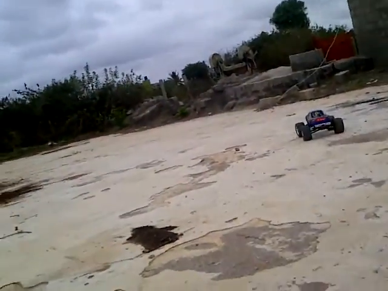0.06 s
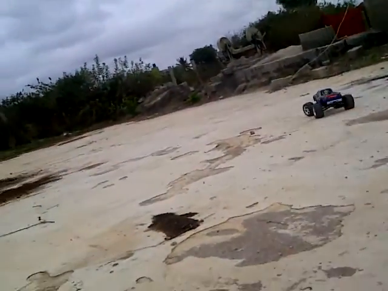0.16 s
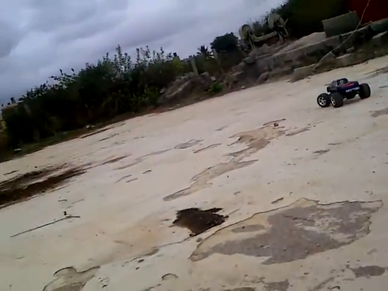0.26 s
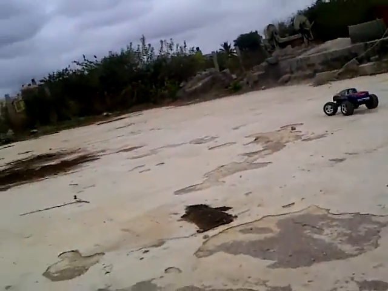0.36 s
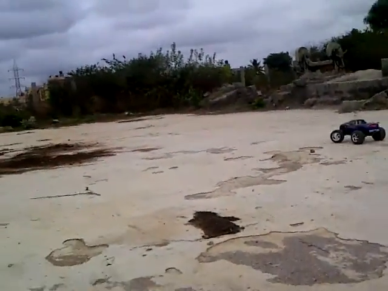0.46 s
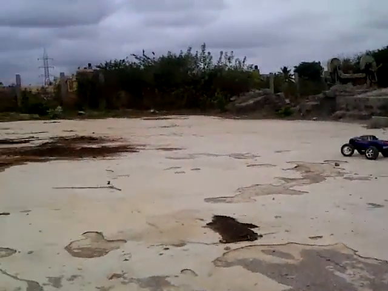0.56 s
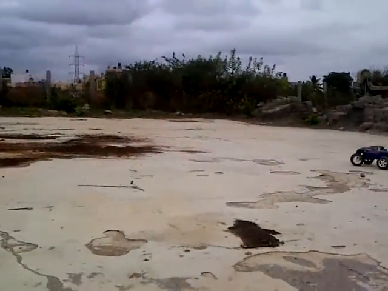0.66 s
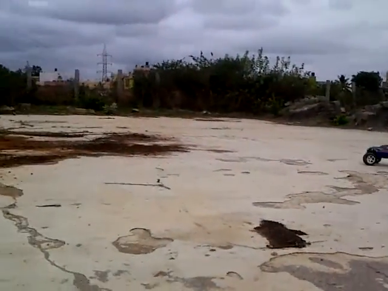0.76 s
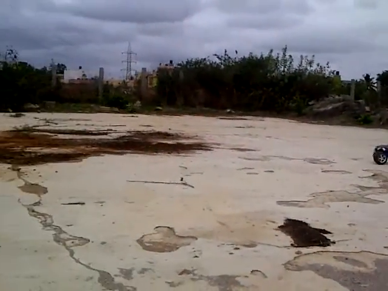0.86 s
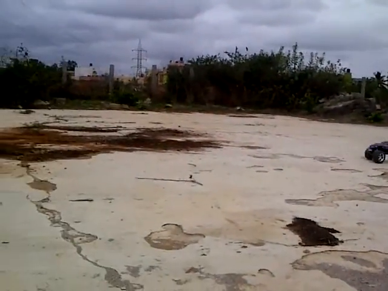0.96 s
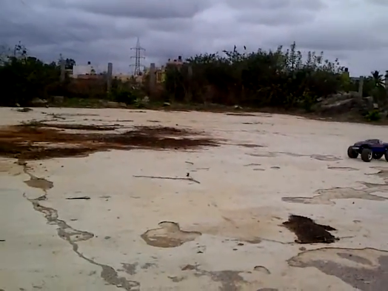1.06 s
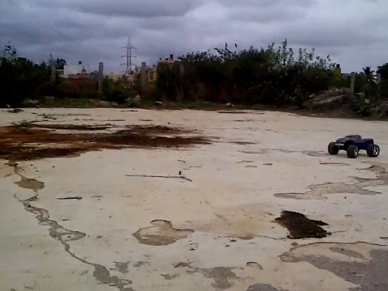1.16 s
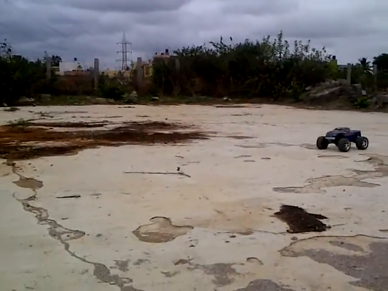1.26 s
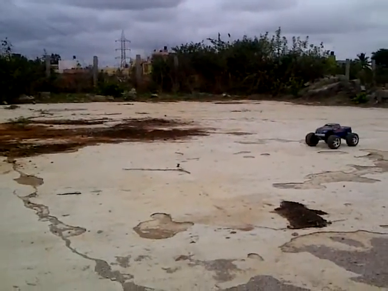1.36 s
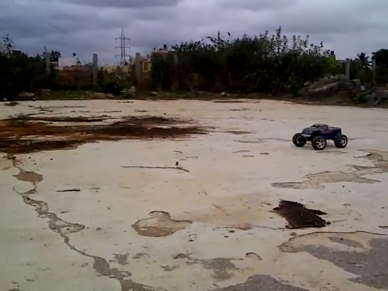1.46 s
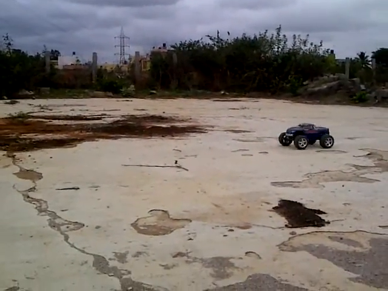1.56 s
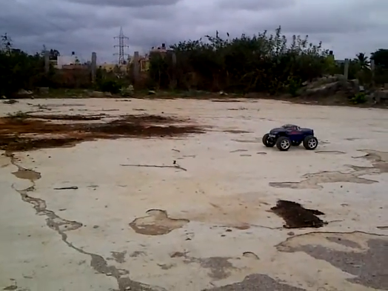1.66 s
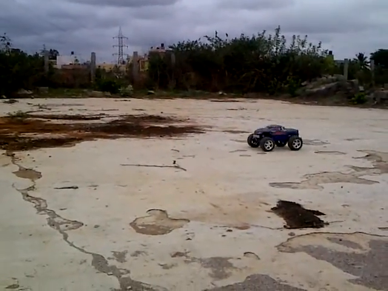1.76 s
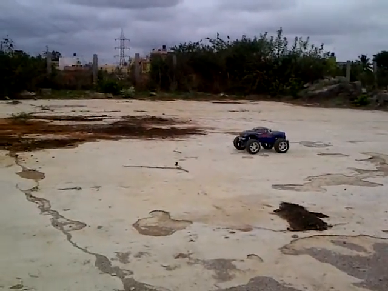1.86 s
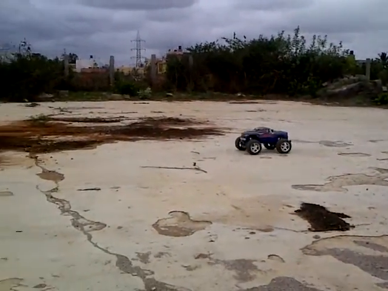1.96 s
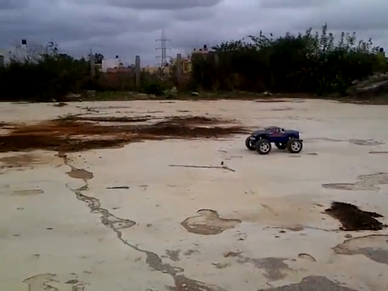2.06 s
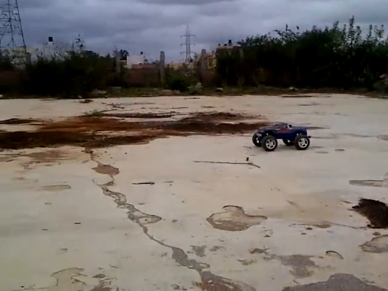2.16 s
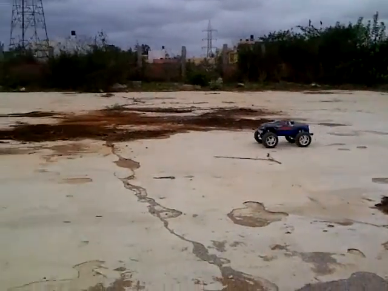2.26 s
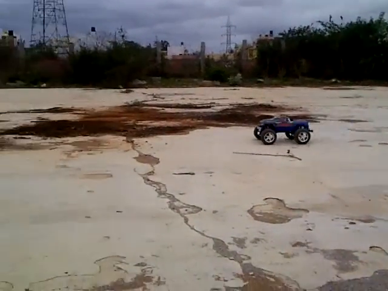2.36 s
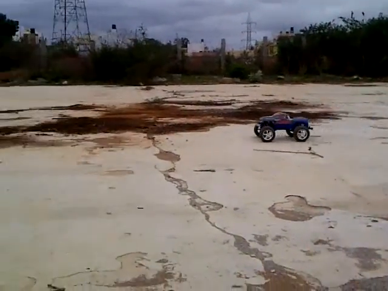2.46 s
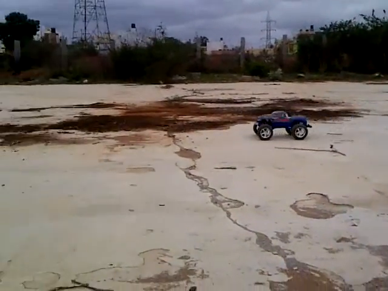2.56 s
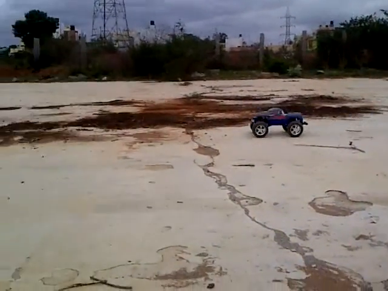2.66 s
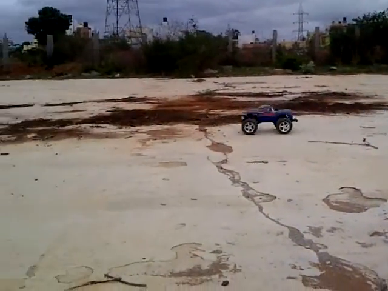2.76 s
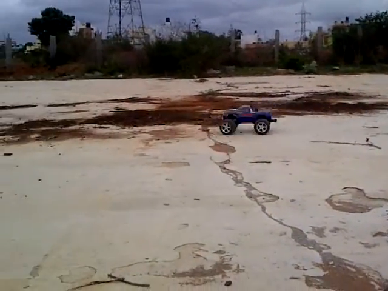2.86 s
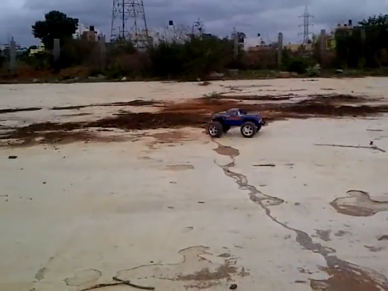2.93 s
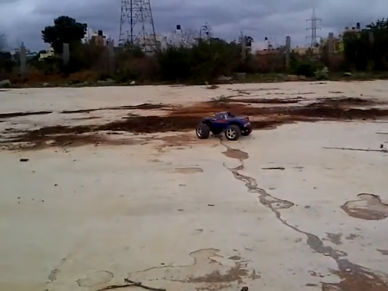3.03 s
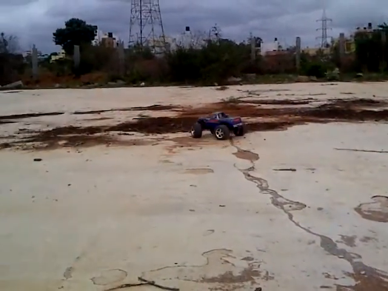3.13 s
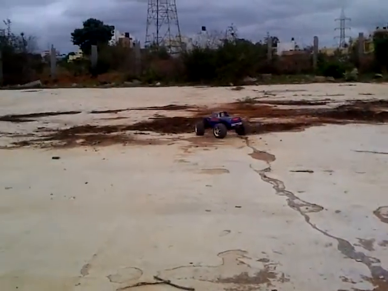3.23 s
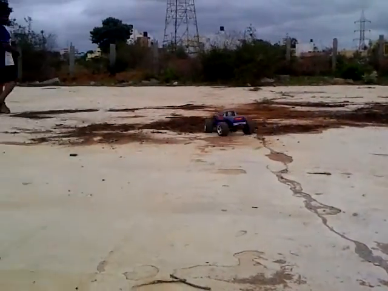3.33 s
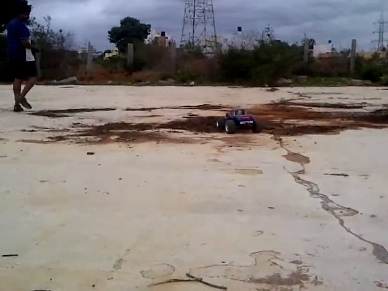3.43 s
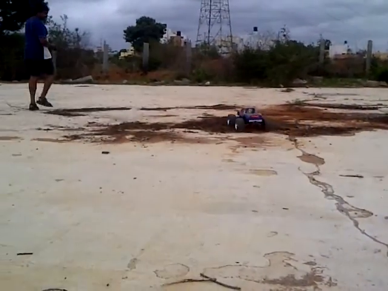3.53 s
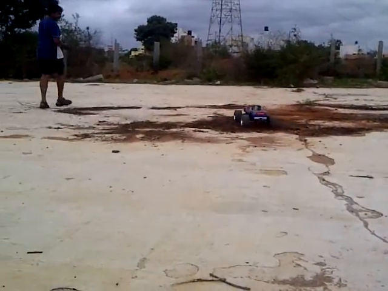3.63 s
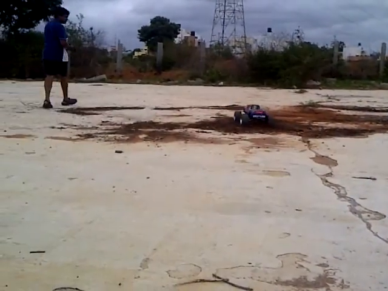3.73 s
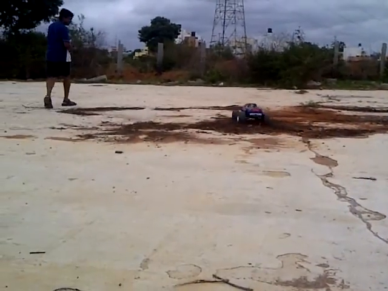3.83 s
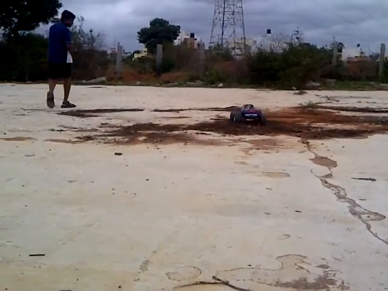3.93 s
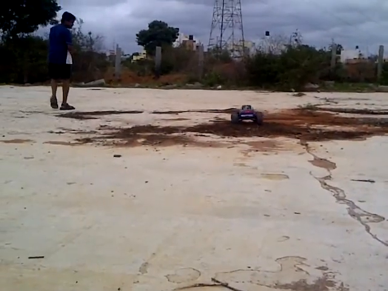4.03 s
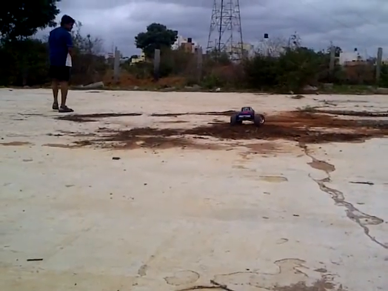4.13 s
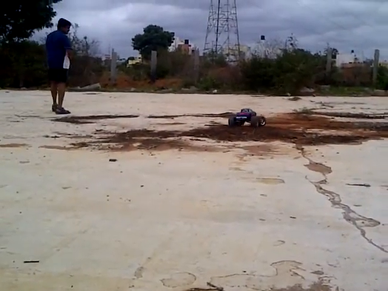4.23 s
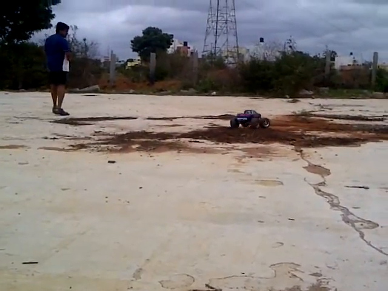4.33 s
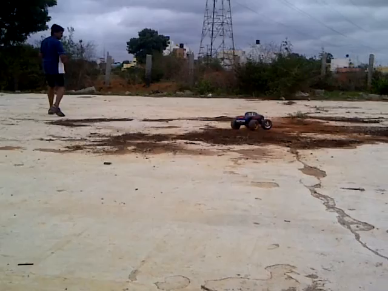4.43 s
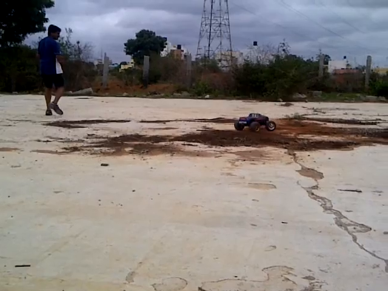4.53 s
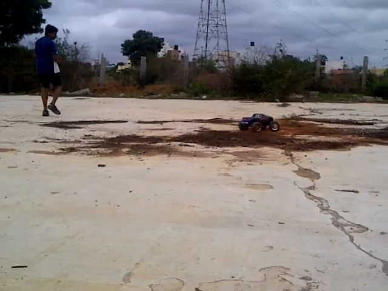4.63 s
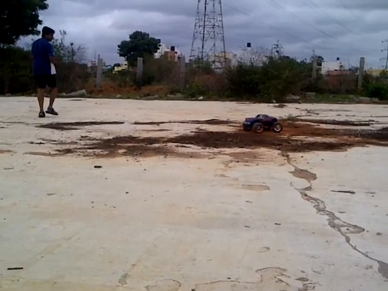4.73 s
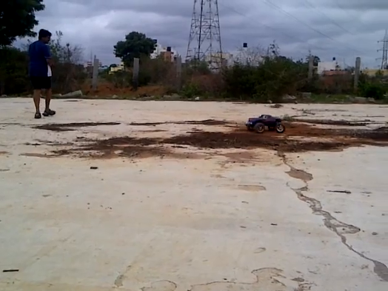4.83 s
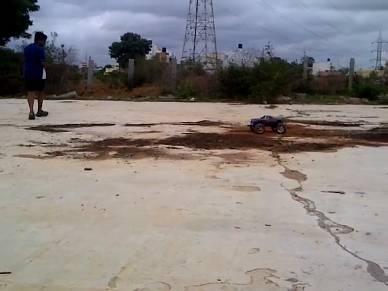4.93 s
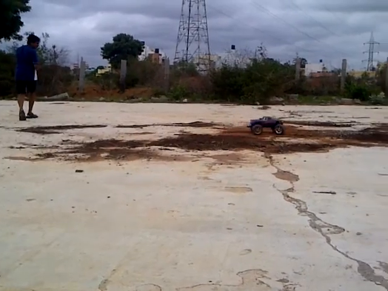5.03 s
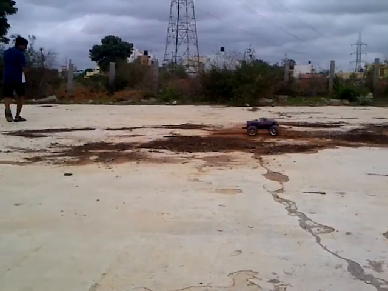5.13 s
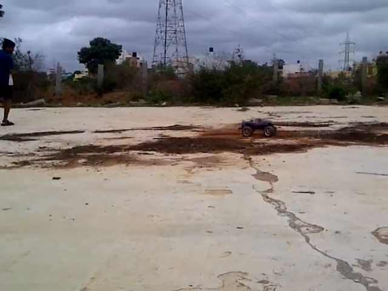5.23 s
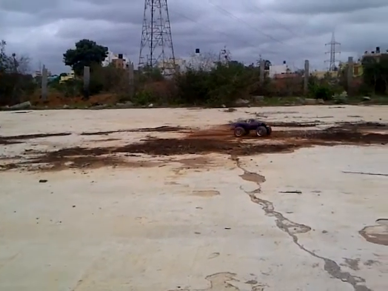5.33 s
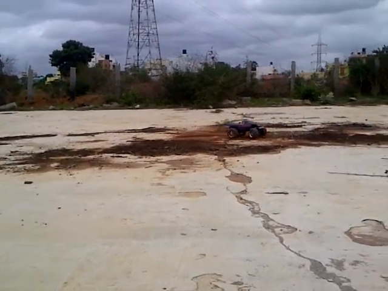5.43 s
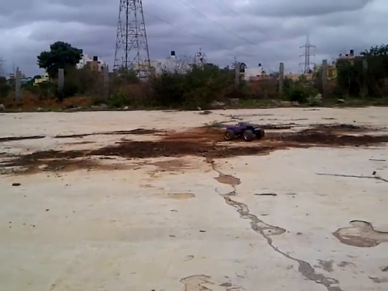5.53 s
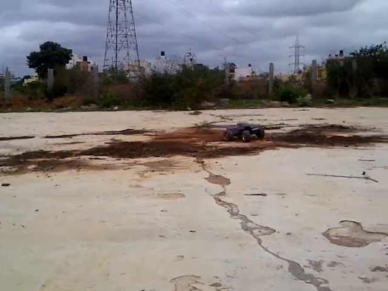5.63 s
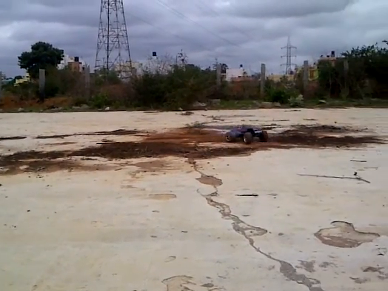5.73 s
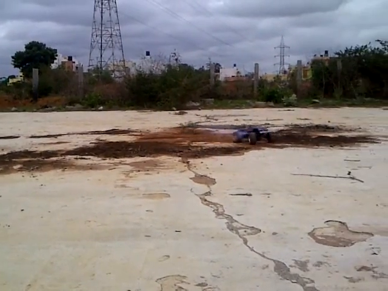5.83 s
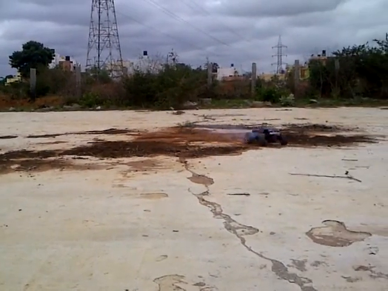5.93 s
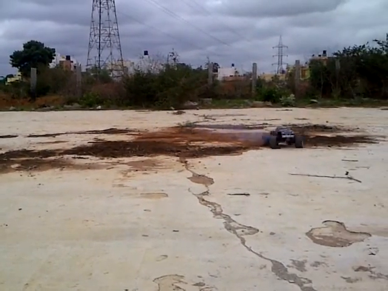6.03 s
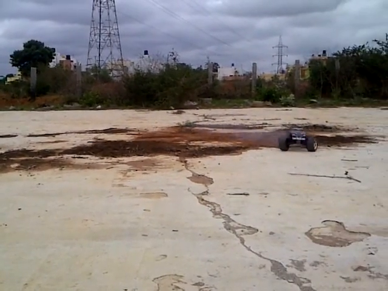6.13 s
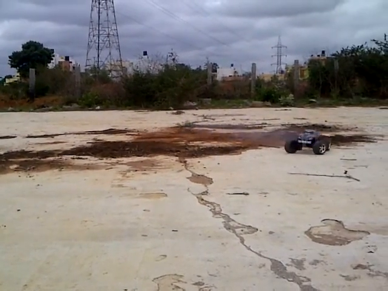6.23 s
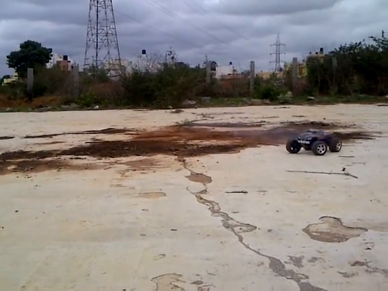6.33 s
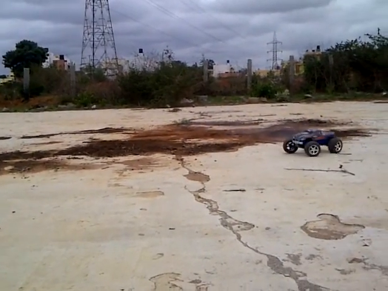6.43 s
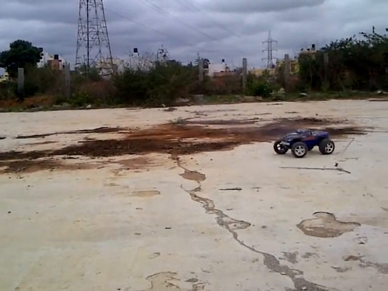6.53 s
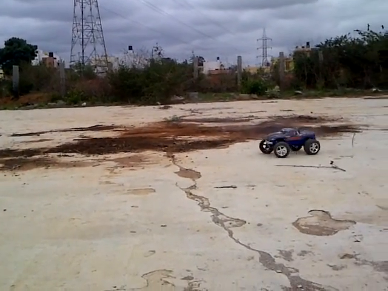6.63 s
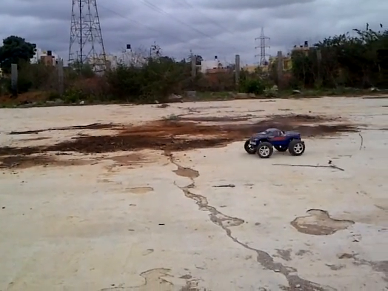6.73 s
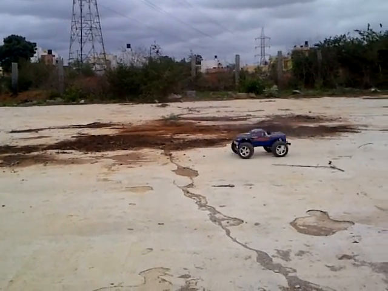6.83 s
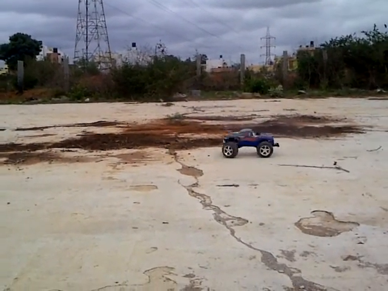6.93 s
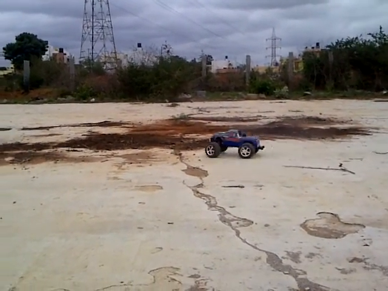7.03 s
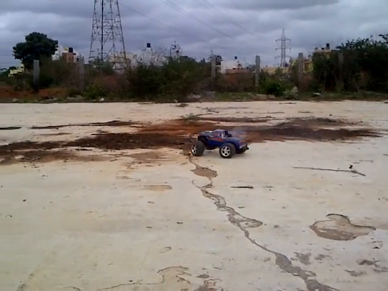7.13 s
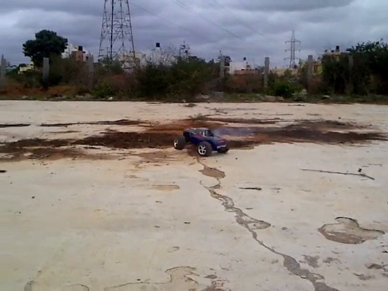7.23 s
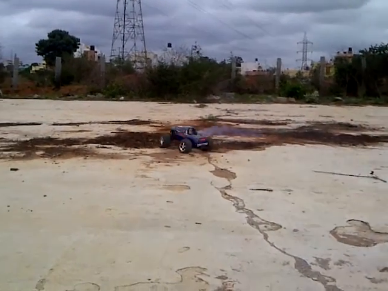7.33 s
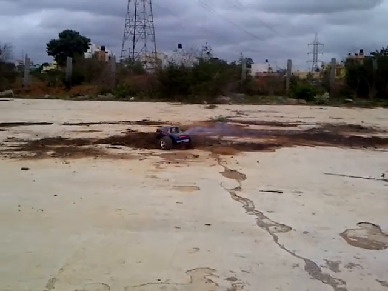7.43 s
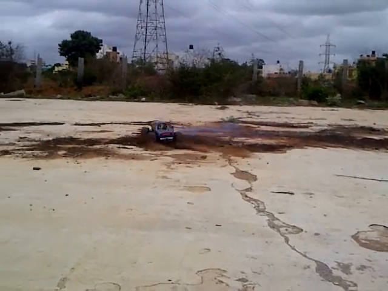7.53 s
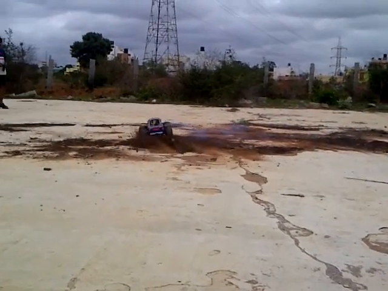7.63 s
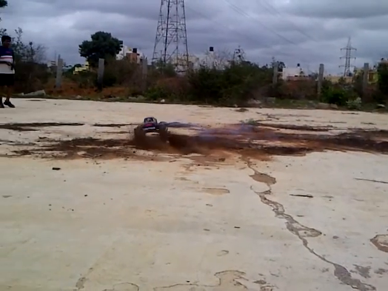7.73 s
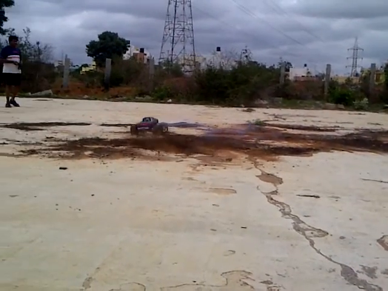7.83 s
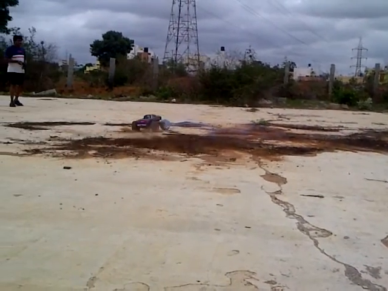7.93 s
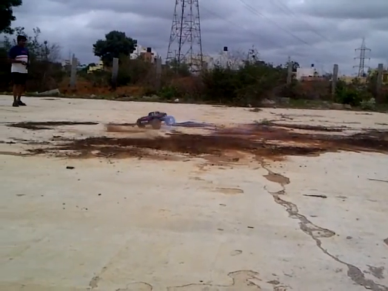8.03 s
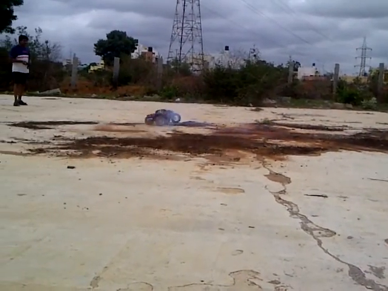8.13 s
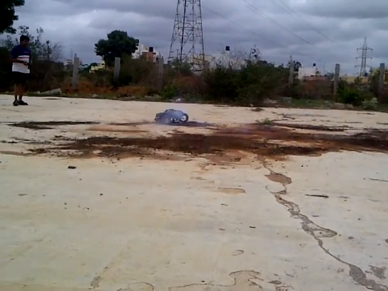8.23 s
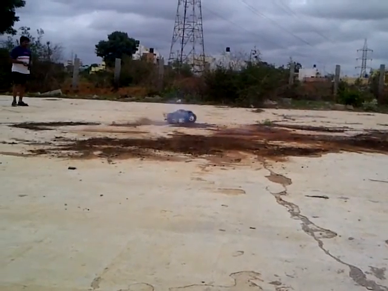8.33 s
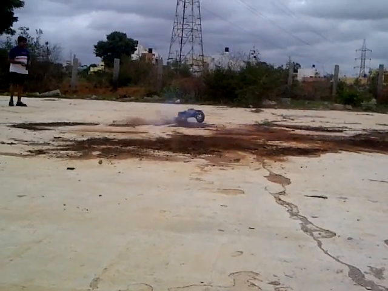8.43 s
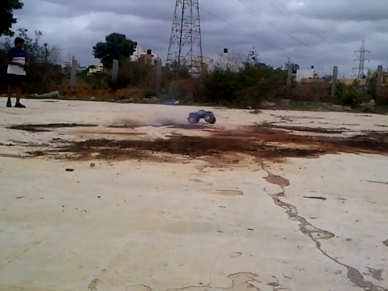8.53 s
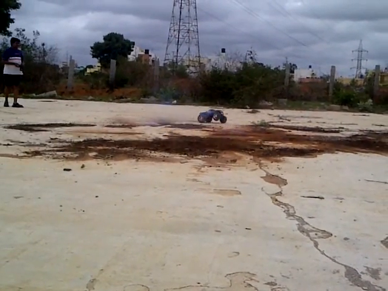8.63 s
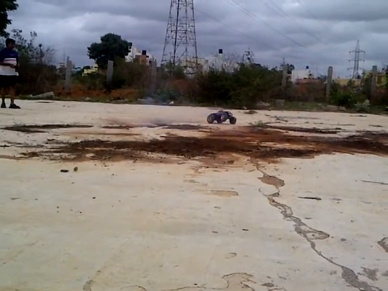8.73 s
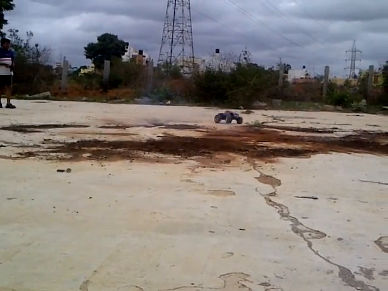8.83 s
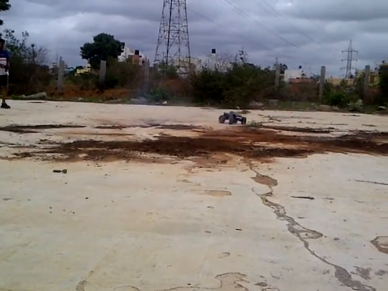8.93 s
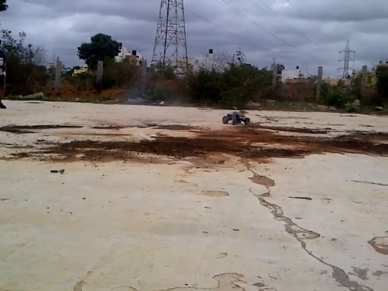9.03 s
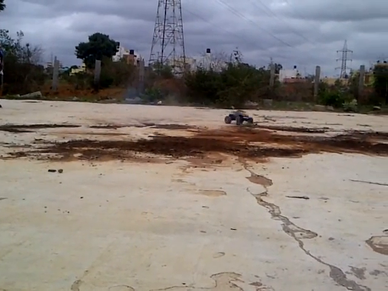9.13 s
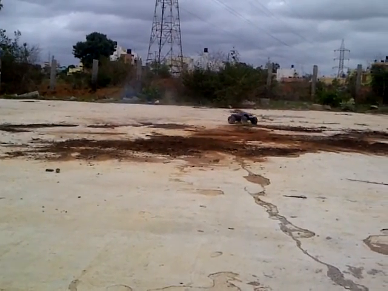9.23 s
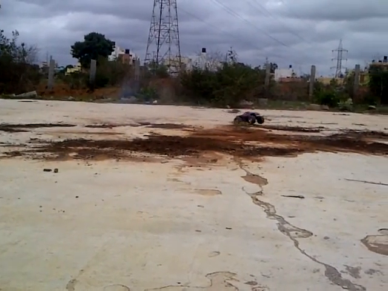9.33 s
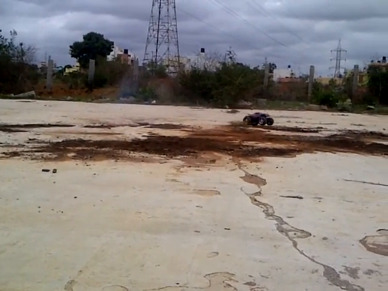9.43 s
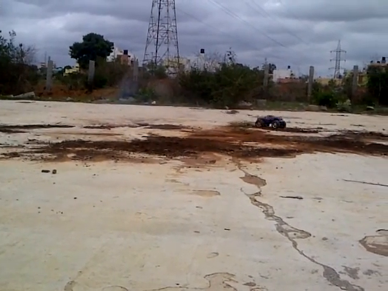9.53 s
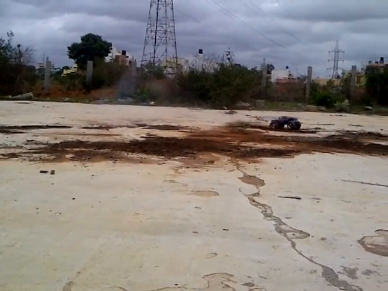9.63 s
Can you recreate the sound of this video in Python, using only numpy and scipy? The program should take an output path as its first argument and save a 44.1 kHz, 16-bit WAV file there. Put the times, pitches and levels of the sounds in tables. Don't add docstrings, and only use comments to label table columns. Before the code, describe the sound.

A tiny two-stroke engine in a model truck buzzes at a fast, hissy idle across an open concrete lot, with a little wind popping on the microphone and a few grit ticks. After about five seconds it revs briefly and falls, then climbs to a fluttering high scream, drops, and surges again at the end. Thin, band-limited phone sound, no voices.

```python
import sys
import numpy as np
from scipy import signal
from scipy.fft import rfft, irfft, next_fast_len
from scipy.io import wavfile
from scipy.ndimage import uniform_filter1d, map_coordinates

SR = 44100
rng = np.random.default_rng(int(sys.argv[2]) if len(sys.argv) > 2 else 0)


def nominal_scale(level):
    x = np.asarray(level, float) / 20
    return 10 ** x


def generate_wav(signal):
    frames = np.transpose(np.atleast_2d(signal))
    scaled = np.clip(frames, -1, 1) * 32767
    pcm = np.round(scaled).astype(np.int16)
    wavfile.write(sys.argv[1], SR, pcm)


N = 427329
STEP = 64

# (time [s], nearness [dB], tail turned to the phone [about -1..1], flank turned to the phone [about
POSE = [(0, 1.5, -0.035, -.45), (.83, -1, 0.084, -0.66), (2, 0, -0.018, -1.02), (2.83, -2, 0.13, -.55),
        (3.32, 1.1, 0.16, -0.76), (4.1, -8.5, 0.44, 0.063), (4.4, -5.5, -0.77, 0.77),
        (4.75, -6.5, -0.14, 1), (5.2, -7.5, 0.85, 0.99), (5.7, -8, -0.38, 0.52), (6.1, 1.6, 0.061, -0.64),
        (7.1, 1.9, -0.16, -1.25), (7.66, -2.5, -0.15, 0.16), (8, -4, 0.12, 0.77), (8.55, -0.2, -0.85, 0.98),
        (9.1, 1.4, -0.089, -.45), (9.3, -11, -0.29, 0.94), (9.69, -2, -0.68, 0.46)]
# (frequency [Hz], level [dB])
SHELL = [(2500, -3.5), (2900, 0.5), (3500, 0), (4300, 4), (5000, 1.5), (6000, 1), (6800, -5), (7100, -8)]


def engine():
    # (frequency [Hz], level [dB])
    outlet = [(1000, -16), (1200, -12.5), (1450, -5), (1600, -3), (1800, -6.5), (2500, -8), (2900, -18),
              (3300, -24)]
    # (frequency [Hz], level [dB])
    fins = [(5500, -37), (6100, -6.5), (6900, 7.5), (7400, 13.5), (8000, 6)]
    # (frequency [Hz], level [dB])
    whistle = [(6000, -26), (6700, -14), (7000, -7), (7200, 0), (7400, 0), (7600, -8), (8000, -12)]
    firing_hz, throttle = drive()
    near_db, tail, flank = curves(POSE)
    orders_db = pipe(firing_hz, throttle, near_db, tail)
    turns = crank_turns(firing_hz)
    sound = np.zeros(N)
    for k, order_db in enumerate(orders_db):
        level = np.sqrt(2) * nominal_scale(order_db + 1.88 * wobble(25))
        sound += level * np.sin(2 * np.pi * (k + 1) * turns + k * k)

    order_hz = np.arange(6, 40)[:, None] * firing_hz[::STEP]
    lift = resonances(order_hz, np.arange(0, N, STEP))
    hiss = gas_hiss(turns)
    idle_share, loaded_share = .52, .33
    hiss_share = idle_share + (loaded_share - idle_share) * np.clip(2 * throttle, 0, 1)
    revved = np.clip((firing_hz - 205) / 200, 0, 1)
    parts = [
        (outlet, outlet, -27.5, 13, 8.5 * tail, -.2),
        (SHELL, SHELL, -31, 13.5, -1.26 * tail, .25 - .3 * np.sqrt(revved)),
        (fins, whistle, -33, 9.5, 8 * flank, .6 - 1.05 * revved)]
    order_gains = 0
    for order_colour, hiss_colour, idle_db, load_db, turned_db, extra_share in parts:
        level = nominal_scale(idle_db + load_db * throttle + near_db + turned_db)
        share = np.clip(hiss_share + extra_share, .1, .97)
        shape = along(order_colour, order_hz) * lift
        shape = shape / np.sqrt(np.sum(shape ** 2, axis=0) / 2 + 2.4)
        order_gains = order_gains + shape * (level * np.sqrt(1 - share))[::STEP]
        sound += level * np.sqrt(share) * steady(coloured(hiss, hiss_colour))
    return sound + firings(turns, order_gains, fade_db=2, drift_rad=.9)


def drive():
    # (time [s], firing rate [Hz], throttle [0-1])
    idle = [
        (0, 201.1, 0.06),
        (1.3, 200.5, 0.01),
        (2.1, 203.7, 0.2),
        (2.9, 199, 0),
        (3.35, 201.7, 0.03),
        (4.3, 198.8, 0),
        (5, 203, 0.27),
    ]
    # (time [s], firing rate [Hz], throttle [0-1])
    revs = [
        [(5.16, 201, 0.32), (5.45, 221, 0.45), (5.76, 240, 0.96), (5.9, 280.6, 0.7), (6.02, 316, 0.65),
         (6.14, 300, 0.7), (6.24, 252, 0.43), (6.42, 214, 0.18), (6.81, 205, 0.05)],
        [(6.95, 219, 0.27), (7.15, 240, 0.67), (7.31, 247, 0.7), (7.39, 280, 1), (7.43, 330, 0.94),
         (7.53, 376, 0.7), (7.57, 348, 1), (7.6, 365, 0.68), (7.76, 376, 0.64)],
        [(7.8, 457, 0.8), (7.89, 419, 0.87), (8.01, 390, 0.8), (8.13, 416, 0.85), (8.34, 471, 0.63),
         (8.5, 458, 0.49), (8.62, 476, 0.52), (8.77, 458, 0.5), (8.86, 434, 0.4)],
        [(8.91, 387, 0.16), (8.99, 365, 0.49), (9.09, 312, 0.37), (9.26, 227, 0.54), (9.47, 246, 0.73),
         (9.53, 275, 0.93), (9.58, 340, 0.9), (9.63, 384, .95), (9.69, 371, 0.7)],
    ]
    return curves(idle + sum(revs, []))


def slip():
    # (time [s], length [s], flutter [%])
    loose_dirt = [
        (5.8, .3, 3.2),
        (6.1, .25, 1.4),
        (7.42, .38, 2),
        (7.8, 1.4, 1.5),
    ]
    return sum(percent * spell(start_s, length_s, np.arange(N)) for start_s, length_s, percent in loose_dirt)


def crank_turns(firing_hz):
    calm_percent = .3
    flutter = (calm_percent + slip()) / 100 * (wobble(80) + .3 * wobble(15))
    lurch = .3 * slip() / 100 * wobble(28)
    hunting = .004 * wobble(5)
    return np.cumsum(firing_hz * (1 + flutter + lurch + hunting)) / SR


def coasting(firing_hz):
    full_hz_per_s = 590
    slope = uniform_filter1d(np.gradient(firing_hz), size=SR // 10) * SR
    return np.clip(-slope / full_hz_per_s, 0, 1)


def pipe(firing_hz, throttle, near_db, tail):
    # (frequency [Hz], level [dB])
    pipe_colour = [(190, -50.5), (300, -39.5), (400, -42), (600, -37), (800, -42), (1000, -38), (1300, -42),
                   (2500, -40)]
    # (time [s], length [s], centre [Hz], lift [dB])
    beams = [(0, 3.2, 398, 2), (0.068, .4, 610, 3), (1.102, 1.2, 600, -2.5), (2.1, 1.5, 950, 5),
             (2.596, 0.58, 597, 4), (3.91, 1.65, 420, -5), (4.105, 0.45, 600, 3), (4.206, 2.2, 222, 3.5),
             (4.6, 0.656, 1000, 7.5), (5.236, 0.476, 1177, 13.5), (5.25, 0.36, 644, 5),
             (5.707, 0.26, 1010, 8.5), (5.983, 0.11, 940, 7.5), (6.07, 0.11, 302, -3.5),
             (6.954, .44, 485, 12.5), (7.047, 0.18, 710, 3.5), (7.386, 0.074, 647, 9.5),
             (7.456, 0.27, 1087, 14), (7.486, 0.083, 730, -9.5), (7.774, 0.25, 444, 7.5),
             (7.808, 0.25, 800, 8.5), (7.89, 0.39, 2050, 7.5), (8.091, .15, 438, 10.5),
             (8.111, 0.1, 1680, 4), (8.248, 0.532, 463, 17), (8.78, 0.14, 440, 7), (9.262, 0.26, 1100, 7),
             (9.414, 0.15, 995, 2), (9.532, .2, 700, 11), (9.569, .2, 1140, 10.5)]
    coarse = np.arange(0, N, STEP)
    order_hz = np.arange(1, 6)[:, None] * firing_hz[::STEP]
    gains = along(pipe_colour, order_hz)
    for start_s, length_s, centre_hz, lift_db in beams:
        gains = gains * ring(order_hz, centre_hz, .24 * centre_hz, lift_db * spell(start_s, length_s, coarse))
    shared_db = 11 * throttle + 0.32 * near_db - 0.5 * tail - 1.5 * coasting(firing_hz)
    fade_db, chop_db = 1.2, 1.3 * slip()
    orders_db = []
    for gain in gains:
        level_db = 20 * np.log10(np.interp(np.arange(N), coarse, gain))
        orders_db.append(level_db + shared_db + fade_db * wobble(3) + chop_db * wobble(35))
    return orders_db


def firings(turns, gains, fade_db, drift_rad):
    slip_fade_db, ground_db = .8, 3
    out = np.zeros(N)
    first_order = np.exp(2j * np.pi * turns)
    order = first_order ** 5
    total_fade_db = fade_db + slip_fade_db * slip()[::STEP]
    for k, gain in enumerate(gains):
        order = order * first_order
        phase = 2 * np.pi * rng.random() + drift_rad * wobble(14, STEP)
        echo_db = ground_db * np.clip(k / 5 - .2, .1, 1) * wobble(5, STEP)
        swing = gain * nominal_scale(total_fade_db * wobble(40, STEP) + echo_db) * np.exp(1j * phase)
        out += np.real(np.repeat(swing, STEP)[:N] * order)
    return out


def gas_hiss(turns):
    port = 1 + 0.17 * np.cos(2 * np.pi * turns)
    stumbles = nominal_scale(1.2 * wobble(60))
    return patchy(port * stumbles * rng.standard_normal(N), depth_db=1.6)


def patchy(x, depth_db):
    hz, t, z = signal.stft(x, SR, nperseg=1024)
    field = uniform_filter1d(rng.standard_normal(z.shape), size=7, axis=0)
    field = uniform_filter1d(field, size=14, axis=1)
    at = np.minimum(t * SR, N - 1).astype(int)
    gain = resonances(hz[:, None], at) ** .6 * nominal_scale(depth_db * unit(field))
    return signal.istft(z * gain, SR, nperseg=1024)[1][:N]


def resonances(hz, at):
    # (time [s], length [s], centre [Hz], lift [dB])
    rings = [(0, .78, 1560, 5.5), (0.6, 0.16, 2430, 7.5), (1.113, .5, 2400, 4.5), (1.124, 1.3, 1543, 9.5),
             (2.49, 0.56, 1370, 6), (3.101, 0.45, 2565, 6.5), (3.201, .85, 1622, 10.5), (4.01, .6, 2580, 9),
             (4.374, 0.83, 7160, 17.5), (4.61, 1.1, 1557, 10.5), (4.993, .28, 2670, 4),
             (5.32, 0.46, 7555, 11), (5.49, 0.16, 3900, 7), (5.996, 0.32, 3730, 6),
             (6.029, 0.15, 1950, -0.5), (6.35, 0.67, 1560, 6.5), (6.962, 0.82, 1410, 1),
             (7, 0.1, 2970, 9.5), (7.096, 0.14, 3690, 7), (7.193, 0.093, 4280, 11),
             (7.279, 0.12, 2580, 13.5), (7.403, 0.15, 3860, 7), (7.442, 0.26, 2050, 17.5),
             (7.74, 0.3, 2020, 7.5), (7.89, 0.77, 6460, 4), (8.095, 0.29, 2450, 1.5), (8.186, .6, 3600, 11),
             (8.292, .3, 5470, 6.5), (9.49, 0.084, 6200, 12.5), (9.599, 0.11, 4530, 9.5)]
    gain = np.ones(np.broadcast(hz, at).shape)
    hz = np.broadcast_to(hz, gain.shape)
    for start_s, length_s, centre_hz, lift_db in rings:
        held = spell(start_s, length_s, at)
        on = held > 0
        width_hz = 220 * (centre_hz / 1600) ** .35
        gain[:, on] *= ring(hz[:, on], centre_hz, width_hz, lift_db * held[on])
    return gain


def ring(hz, centre_hz, width_hz, lift_db):
    return 1 + (nominal_scale(lift_db) - 1) / np.sqrt(1 + (2 * (hz - centre_hz) / width_hz) ** 4)


def spell(start_s, length_s, at):
    edge_s = .07
    inside_s = np.minimum(at / SR - start_s, start_s + length_s - at / SR)
    return np.clip(inside_s / edge_s + .5, 0, 1)


def roar():
    # (frequency [Hz], level [dB])
    roar_colour = [(20, -29), (100, -21.5), (150, -18), (200, -8), (300, -2.5), (500, 2.5), (1250, 2),
                   (1500, -36)]
    throttle, near_db = drive()[1], curves(POSE)[0]
    level_db = -35.5 + 7 * throttle + 0.27 * near_db + 1.2 * wobble(11)
    return nominal_scale(level_db) * unit(coloured(rng.standard_normal(N), roar_colour))


def ticks():
    # (time [s], peak [dB])
    grit = [
        (1.442, -13.5),
        (1.4727, -12.5),
        (1.5823, -3.5),
        (2.11, -5),
        (3.03, -1),
        (3.049, -5),
    ]
    t60_s = .014
    out, t = np.zeros(N + SR), np.arange(SR // 40) / SR
    for s, peak_db in grit:
        out[round(s * SR):][:len(t)] += nominal_scale(peak_db - 6 - 60 * t / t60_s) * rng.standard_normal(len(t))
    return coloured(out[:N], SHELL)


def wind_pops():
    # (time [s], peak [dB], pitch [Hz], t60 [s])
    pops = [(0.543, -18.5, 367, 0.027), (0.559, -14, 393, 0.025), (0.665, -14, 295, 0.038),
            (0.679, -10, 409, 0.065), (0.711, -15, 279, 0.018), (0.731, -18.5, 348, 0.035),
            (0.75, -16.5, 624, 0.026), (0.774, -14, 465, 0.063), (0.794, -17.5, 283, 0.08),
            (0.808, -11.5, 402, 0.018), (3.235, -20.5, 270, 0.048), (3.267, -21.5, 594, 0.054),
            (3.283, -16.5, 422, 0.019), (3.688, -22.5, 288, 0.048), (5.055, -26, 340, 0.042)]
    attack_s = 0.0018
    out, t = np.zeros(N + SR), np.arange(SR // 10) / SR
    for s, peak_db, hz, t60_s in pops:
        ragged = uniform_filter1d(rng.standard_normal(len(t)), size=30) * 4.1
        swing = np.sin(2 * np.pi * hz * t) + ragged
        envelope = nominal_scale(peak_db + 5 - 60 * t / t60_s) * (1 - np.exp(-t / attack_s))
        out[round(s * SR):][:len(t)] += envelope * swing
    return coloured(out[:N], [(120, -28), (220, 2.0), (800, -4.0), (1500, -33.5)])


def unit(x):
    return x / np.sqrt(np.mean(x ** 2) + 1e-20)


def steady(x):
    return x / np.sqrt(np.abs(uniform_filter1d(x ** 2, size=SR // 10)) + 1e-20)


def curves(rows):
    s, *columns = np.transpose(rows)
    return [np.interp(np.arange(N) / SR, s, column) for column in columns]


def wobble(rate_hz, every=1):
    coarse = np.arange(0, N + STEP, STEP)
    knots = rng.standard_normal(int(N * rate_hz / SR) + 4)
    return np.interp(np.arange(0, N, every), coarse, map_coordinates(knots, [coarse * rate_hz / SR]))


def along(spectrum, hz):
    f, db = np.transpose(spectrum)
    return nominal_scale(np.interp(np.log(hz + 1), np.log(f), db, left=-120, right=-120))


def coloured(x, spectrum):
    m = next_fast_len(N + 8192)
    return irfft(rfft(x, m) * along(spectrum, np.fft.rfftfreq(m, 1 / SR)), m)[:N]


def scene():
    return np.tile(engine() + roar() + ticks() + wind_pops(), (2, 1))


def band_limit(x):
    return signal.sosfilt(signal.butter(12, 9100, fs=SR, output="sos"), x)


def record(dry):
    # (frequency [Hz], level [dB])
    mirror = [(7950, -30.5), (8100, 4), (8400, -14.5), (8800, -25), (9100, -45.5)]
    phone_rate_hz, ceiling = 16000, .75
    held = dry[0] / (1 + np.abs(dry[0] / ceiling) ** 5) ** (1 / 5)
    band = coloured(held, [(10, 0), (7700, 0), (7990, -14)])
    folded = 2 * band * np.cos(2 * np.pi * phone_rate_hz * np.arange(N) / SR)
    mix = np.tile(band + coloured(folded, mirror), (2, 1))
    return band_limit(mix)


dry = scene()
out = record(dry)
generate_wav(out)
```